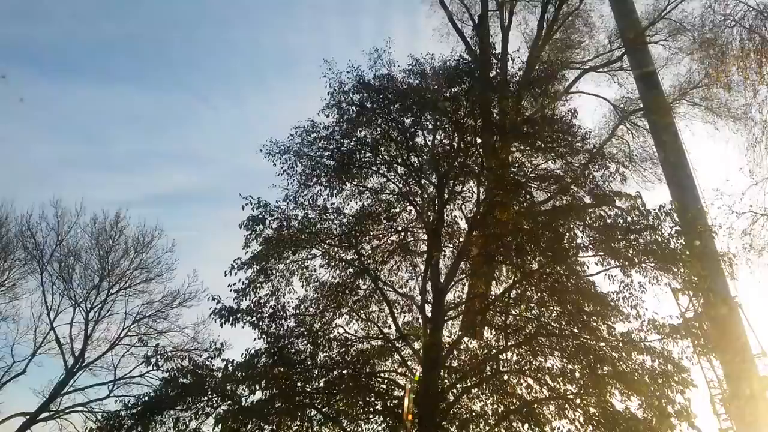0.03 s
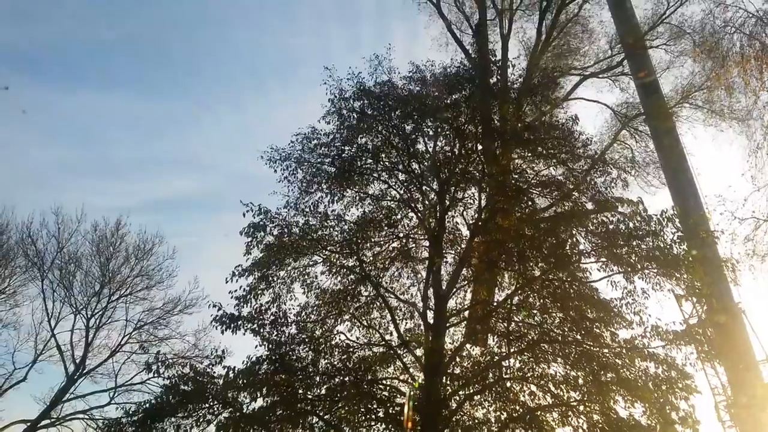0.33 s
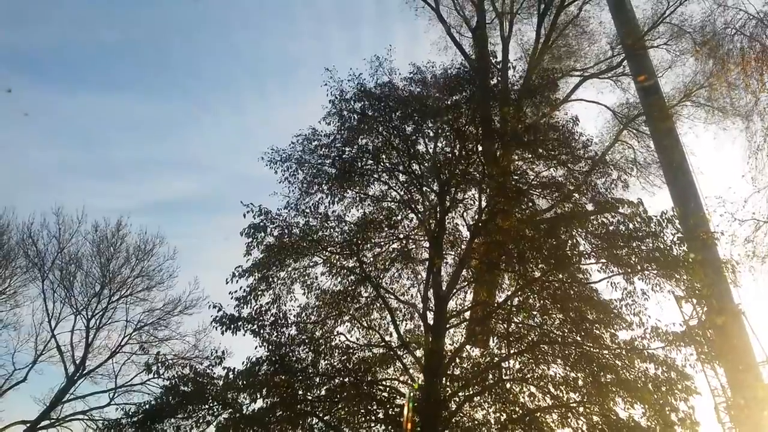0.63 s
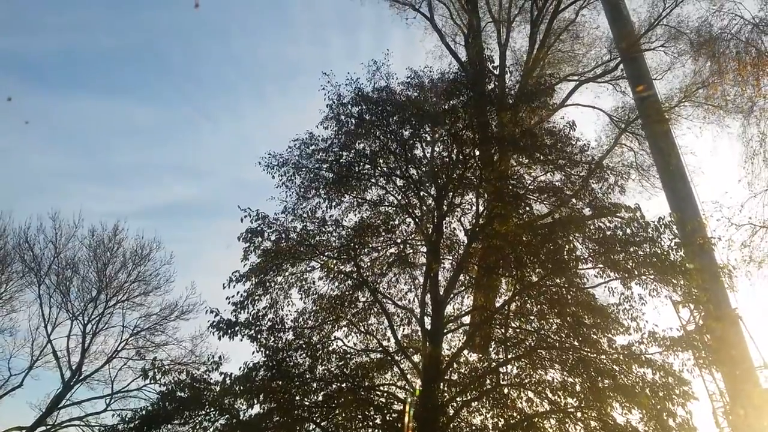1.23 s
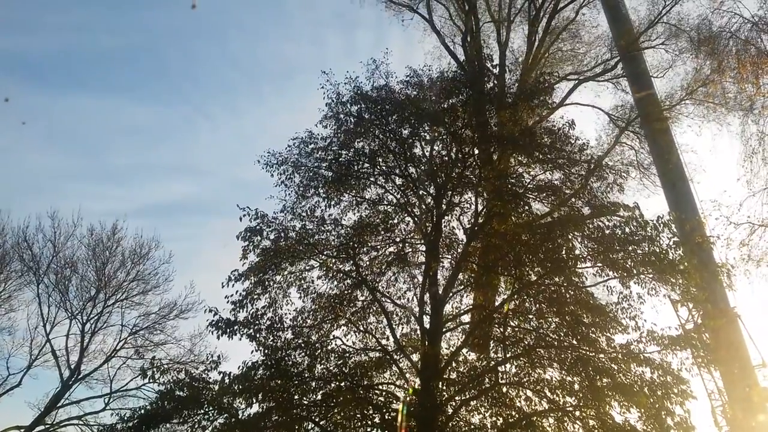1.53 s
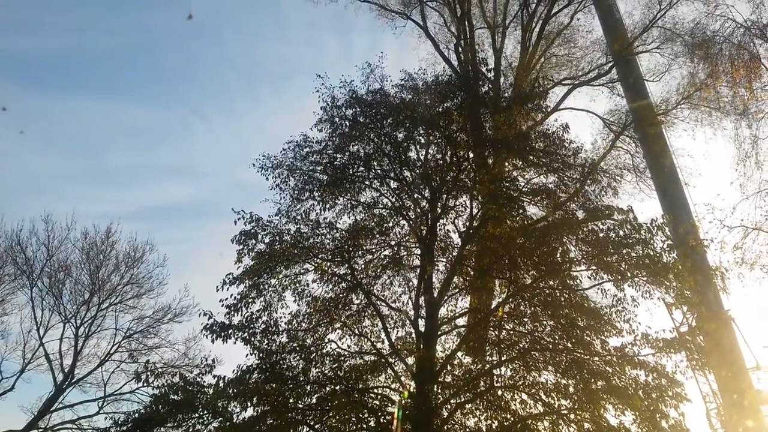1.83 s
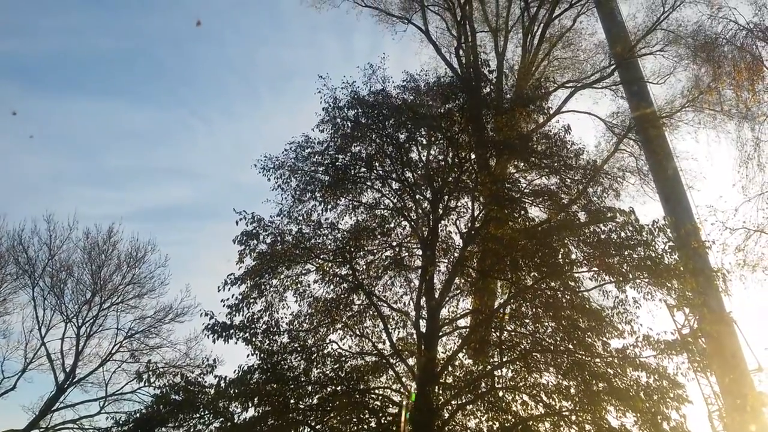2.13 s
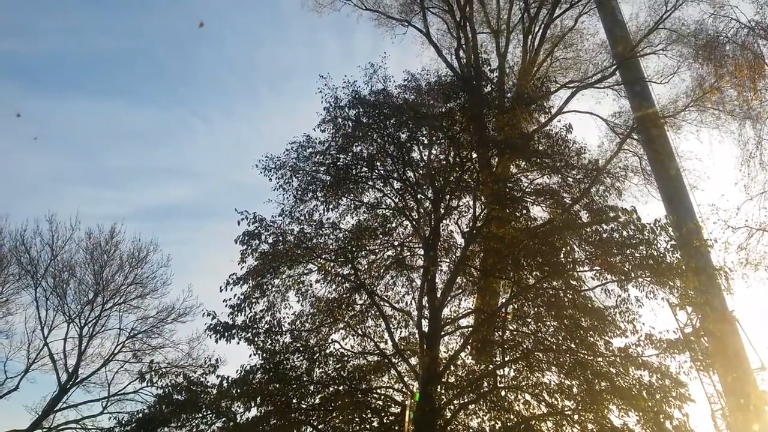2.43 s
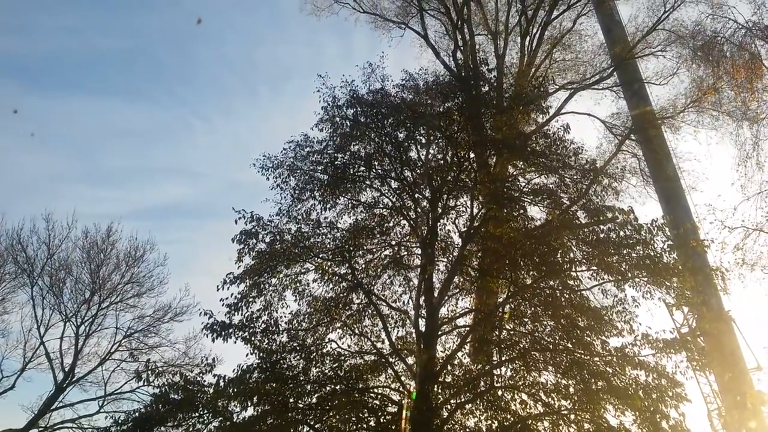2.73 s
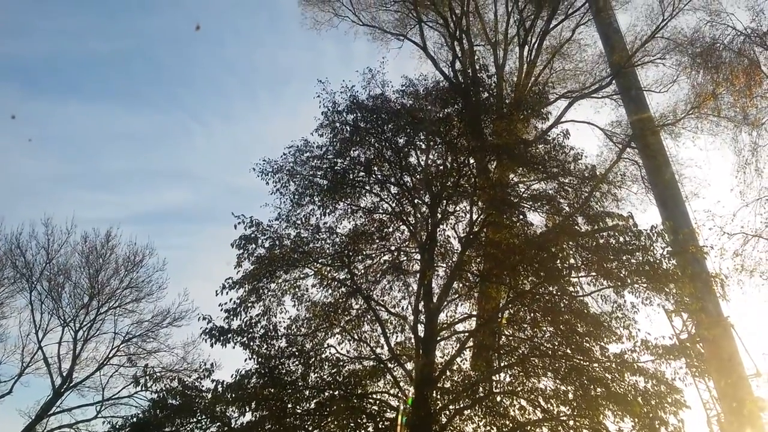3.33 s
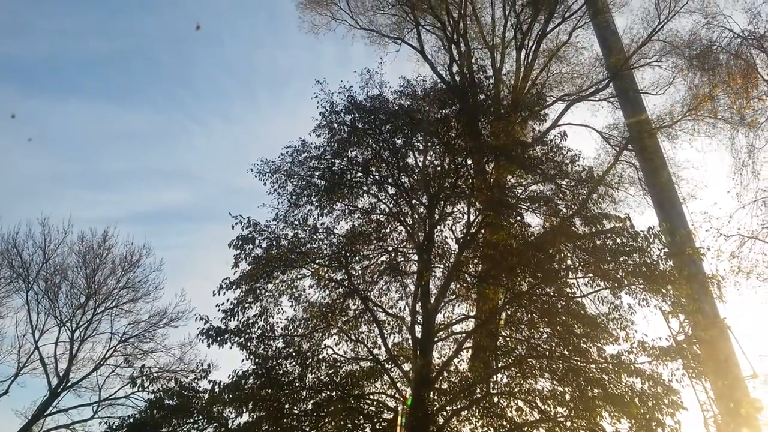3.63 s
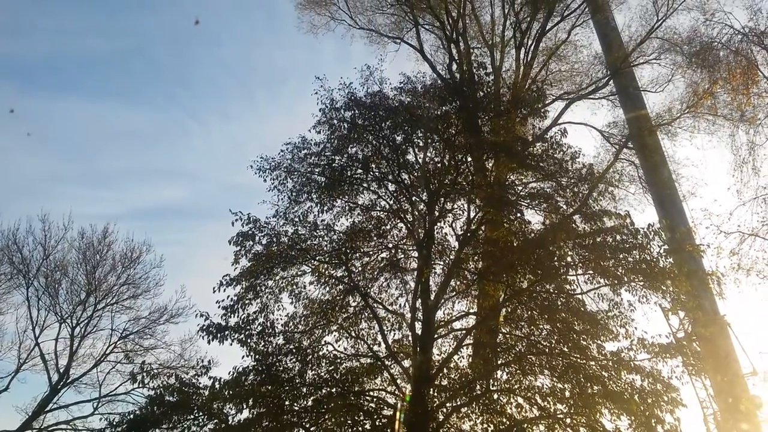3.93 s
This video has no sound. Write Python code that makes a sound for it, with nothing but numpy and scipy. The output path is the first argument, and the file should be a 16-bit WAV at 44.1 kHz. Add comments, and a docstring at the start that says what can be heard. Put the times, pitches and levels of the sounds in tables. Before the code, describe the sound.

Low engine rumble fades in among trees, with a wavering traffic drone, tyre wash and faint high chirring. Late on, something cracks loudly right at the microphone, a knock follows, and the background dips slightly.

```python
"""A distant engine idles outdoors under trees, its orders beating into a throb over a pulsing exhaust.
Far traffic adds a wavering drone and a wash of singing tyres; faint chirps and high chirring come and go.
Close by, dull knocks sound, and something, probably the microphone's housing, cracks in a quick rattle:
each contact booms, ticks and scrapes. The mix fades in, and a gain control ducks it after the crack."""
import sys
import numpy as np
from scipy import signal
from scipy.fft import rfft, irfft
from scipy.io import wavfile

SR = 44100
rng = np.random.default_rng(int(sys.argv[2]) if len(sys.argv) > 2 else 0)


def dump(signal):
    """Clip the signal to [-1, 1] and save it as 16-bit WAV at the path in sys.argv[1]."""
    limited = np.clip(np.atleast_2d(signal).T, -1, 1)
    pcm = np.round(limited * 32767).astype(np.int16)
    wavfile.write(sys.argv[1], SR, pcm)


N = 176400
T = np.arange(N) / SR

# engine hum: order of the cycle rate, level/dB
ENGINE_ORDERS = [(5, -49.5), (6, -38), (7, -56.5), (10, -55.5), (26, -59), (60, -64.5)]
# swell of one deeper order: t/s, level/dB
BOOM_SWELL = [(1.9, -53), (2.25, -40), (2.5, -39), (3.05, -59)]
# exhaust colour: f/Hz, relative level/dB
EXHAUST_COLOUR = [(25, -29), (50, -14.5), (85, -9.5), (125, -1), (180, -3), (230, -10.5), (330, -15),
                  (600, -22.5), (1500, -49)]
# a vehicle speeds up and fades, then a lower note takes over: t/s, f/Hz, level/dB
DRONE_CURVE = [(.4, 140.1, -43.5), (1.05, 140.7, -39.5), (1.7, 139.3, -41), (2.3, 153.7, -42.5),
               (2.6, 164, -50.5), (2.68, 120.1, -46), (3.2, 122, -47), (4, 130.9, -42.5)]
# its overtones: harmonic number, level/dB against the fundamental
DRONE_HARMONICS = [(2, -14.5), (3, -21.5), (4, -19.5)]
# tyres sing as cars go by: t/s, f/Hz, level/dB
SING_CURVE = [(1.2, 1370, -67.5), (1.85, 1464, -57), (2.25, 1438, -71.5), (3.1, 1375, -70),
              (3.42, 1558, -63), (3.7, 1600, -79)]
# colour of the tyre wash: f/Hz, relative level/dB
WASH_COLOUR = [(100, -18.5), (280, -2), (560, -0.5), (700, -8.5), (900, -3.5), (1100, -7), (1450, -8.5),
               (1800, -15.5), (2400, -16.5), (4000, -22), (9000, -38.5)]
# machine whines in the wash: f/Hz, width/Hz, level/dB against the wash
MACHINE_WHINES = [(834, 65, -15), (2299, 74, -20.5)]
# fader ride of the wash: t/s, level/dB
WASH_RIDE = [(.4, -50), (1.2, -52), (1.45, -48), (1.75, -47.5), (2.2, -51.5), (2.7, -49.5), (3.0, -50),
             (3.4, -49.5), (4, -52)]
# hiss colour: f/Hz, relative level/dB
HISS_COLOUR = [(500, -9), (3300, 1.5), (7000, 2), (14500, -2.5)]
# dull blows: t/s, strength/dB, pitch factor, hardness cutoff/Hz
KNOCK_HITS = [(0.4445, -4.5, 1.28, 450), (3.5770, 5, 0.957, 2200), (3.858, -22, 0.98, 800)]
# what they ring: f/Hz, relative level/dB, t60/s
KNOCK_RESONANCES = [(112, -23.5, 0.13), (188.6, -12, 0.067), (342, -15.5, 0.037), (470, -10, 0.014)]
# chirps, perhaps of birds: peak t/s, spread/s, f/Hz, width/Hz, level/dB
CHIRP_SWELLS = [(0.596, 0.0032, 2850, 1300, -48.5), (1.132, .012, 8750, 450, -61),
                (1.338, 0.035, 3350, 450, -59.5), (1.565, 0.022, 3360, 350, -60.5),
                (3.239, 0.023, 3750, 1000, -50), (3.6, 0.013, 3580, 900, -50.5),
                (3.869, 0.0084, 3560, 900, -54), (3.963, 0.0087, 3600, 900, -53)]
# chirring: start t/s, length/s, centre f/Hz, level/dB of a band at the centre
CHIRR_BURSTS = [(0.608, .1, 10300, -68.5), (0.734, .28, 11000, -67), (1.155, 0.2, 11160, -66),
                (1.358, .16, 10600, -66.5), (1.527, .22, 11100, -65), (1.813, 0.19, 10800, -65),
                (2.166, 0.22, 10300, -67.5), (2.42, 0.35, 10580, -67.5), (2.749, 0.216, 11100, -63.5),
                (3.065, .2, 10200, -66.5), (3.28, 0.19, 10600, -66), (3.65, 0.28, 10900, -68.5)]
# contacts of the crack: t/s, signed shove, tick level/dB, tick pitch factor
CRACK_CONTACTS = [(3.4930, 0.02, -8, 1.2), (3.4950, -0.87, -12.5, 1.05), (3.4969, 0.92, -5, 1.1),
                  (3.5075, .3, -31.5, .8), (3.512, .04, -13, 1.12), (3.5131, -1.3, 5, .9),
                  (3.5151, 1.3, -4, 0.92), (3.5200, -0.052, -8, 1.13), (3.5235, 1.19, -7, 0.85),
                  (3.579, -.04, -26, 0.92), (3.5843, 0.096, -23, 1.1)]
# body of the housing: f/Hz, relative level/dB, t60/s
BODY_MODES = [(168, -29.5, 0.19), (221, -22, 0.13), (335, -22.5, .09), (387, -18.5, 0.073),
              (450, -23.5, 0.067), (724, -19, 0.016)]
# its thin edge: f/Hz, relative level/dB, t60/s
EDGE_MODES = [(2700, -1.5, 0.0028), (3300, -3.5, 0.0064), (6270, -12.5, .004), (12800, -27, 0.008)]
# colour of the parts rubbing: f/Hz, relative level/dB
SCRAPE_COLOUR = [(2000, -3.5), (3600, 5), (5000, -5.5), (6500, -0.5), (10200, -20), (13000, -10.5)]
# opening fade: t/s, level/dB
FADE_CURVE = [(.375, -94), (.39, -26.5), (.45, -16.5), (.55, -9.5), (.64, -5)]


def from_db(db):
    """Decibels to gain."""
    return 10 ** (np.asarray(db) / 20)


def rms_one(x):
    """Scale to unit rms."""
    return x / np.sqrt(np.mean(x ** 2) + 1e-20)


def automation(rows):
    """Join breakpoints by straight lines, one curve per column after the time."""
    times, *columns = np.transpose(rows)
    return [np.interp(T, times, column) for column in columns]


def drift(rate_hz):
    """Smooth random modulation, rms about 1."""
    hop, run_in = 40, 2000
    pole = np.exp(-2 * np.pi * hop * rate_hz / SR)
    white = rng.standard_normal(N // hop + run_in + 2)
    slow = signal.lfilter([1], [1, -2 * pole, pole * pole], white)[run_in:]
    return np.interp(np.arange(N) / hop, np.arange(len(slow)), rms_one(slow))


def smooth(x, seconds):
    """One-pole low-pass with a time constant."""
    pole = np.exp(-1 / (seconds * SR))
    return signal.lfilter([1 - pole], [1, -pole], x + 1e-18)


def impulse(s):
    """A unit click at s seconds."""
    return signal.unit_impulse(N, int(s * SR))


def ring(clicks, hz, t60):
    """A resonator: a unit click starts a decaying sine of height 1."""
    r, w = np.exp(-np.log(1000) / (t60 * SR)), 2 * np.pi * hz / SR
    return signal.lfilter([0, np.sin(w)], [1, -2 * r * np.cos(w), r * r], clicks + 1e-18)


def noise(colour):
    """Coloured noise, rolled off below its lowest breakpoint, rms 1."""
    hz, db = np.transpose(colour)
    bins = np.maximum(np.arange(N // 2 + 1) * SR / N, 1)
    gain = from_db(np.interp(np.log(bins), np.log(hz), db)) * np.minimum(bins / hz[0], 1) ** 2
    return rms_one(irfft(rfft(rng.standard_normal(N)) * gain, N))


def band_noise(hz, width_hz):
    """Noise in one band, rms 1."""
    edges = np.clip([hz - width_hz / 2, hz + width_hz / 2], 20, .45 * SR)
    band_pass = signal.butter(2, edges, "band", fs=SR, output="sos")
    return rms_one(signal.sosfilt(band_pass, rng.standard_normal(N)))


def tone(hz):
    """A sine on a pitch curve, rms 1."""
    return np.sqrt(2) * np.sin(2 * np.pi * (np.cumsum(hz) / SR + rng.random()))


def swell(peak_s, spread_s, hz, width_hz, db):
    """A band of noise under a bell-shaped envelope."""
    return from_db(db) * np.exp(-.5 * ((T - peak_s) / spread_s) ** 2) * band_noise(hz, width_hz)


def idling_engine(cycle_hz=9.76, boom_order=4, exhaust_db=-41):
    """Neighbouring engine orders beat into a throb; the exhaust rumble pulses with the firing."""
    cycle = cycle_hz * (1 + .004 * drift(2))
    partials = [tone(round(order) * cycle) for order, _ in ENGINE_ORDERS]
    hum = sum(partial * from_db(db + 1.2 * drift(3)) for partial, (_, db) in zip(partials, ENGINE_ORDERS))
    boom = from_db(automation(BOOM_SWELL)[0]) * tone(boom_order * cycle)
    firing = 1 + .205 * partials[1]
    return hum + boom + from_db(exhaust_db) * noise(EXHAUST_COLOUR) * firing


def vehicle_drone(wander=.005, flutter_db=1.3, fading_db=2.5):
    """A far vehicle's wavering note, each overtone fading in and out on its own."""
    hz, level_db = automation(DRONE_CURVE)
    hz = hz * (1 + wander * drift(4.2))
    overtones = sum(from_db(db + fading_db * drift(3.8)) * tone(round(k) * hz)
                    for k, db in DRONE_HARMONICS)
    return from_db(level_db + flutter_db * drift(6)) * (tone(hz) + overtones)


def tyres(blur_hz=30):
    """Far tyres sing a blurred, gliding note over a road wash tinged with machine whine."""
    hz, sing_db = automation(SING_CURVE)
    sing = rms_one(drift(blur_hz) * tone(hz) + drift(blur_hz) * tone(hz + blur_hz))
    wash = noise(WASH_COLOUR) + sum(from_db(db) * band_noise(f, width) for f, width, db in MACHINE_WHINES)
    wash_db = automation(WASH_RIDE)[0] + .6 * drift(20)
    return from_db(sing_db) * sing + from_db(wash_db) * wash


def hiss(level_db=-56.5):
    """An even bed of airy noise."""
    return from_db(level_db) * noise(HISS_COLOUR)


def knocks():
    """Soft blows that reach only low modes; the lower two swing against the upper two."""
    out = 0
    for s, strength_db, pitch, hardness_hz in KNOCK_HITS:
        contact_s = 1 / (2 * np.pi * hardness_hz)
        force = from_db(strength_db) * smooth(smooth(impulse(s), contact_s), contact_s)
        for polarity, (hz, db, t60) in zip((-1, -1, 1, 1), KNOCK_RESONANCES):
            out += polarity * from_db(db) * ring(force, hz * pitch, t60 / pitch)
    return out


def chirps():
    """Short hoarse swells of narrow noise."""
    return sum(swell(*row) for row in CHIRP_SWELLS)


def chirring(band_hz=500, spread_hz=1560, ramp_s=.033, flicker_db=2.2, grain_db=3):
    """Grainy bursts of high noise bands, each sharing some flicker with its neighbours."""
    bands = np.arange(8000, 13500, band_hz)
    start, length, centre_hz, db = np.transpose(CHIRR_BURSTS)[:, :, None]
    gates = np.clip(np.minimum(T - start, start + length - T) / ramp_s + .5, 0, 1)
    colours = from_db(db) * np.exp(-.5 * ((bands - centre_hz) / spread_hz) ** 2)
    envelopes = colours.T @ gates
    flicker = [flicker_db * drift(30) for _ in range(len(bands) + 1)]
    chirr = sum(envelopes[k] * from_db(flicker[k] + flicker[k + 1]) * band_noise(hz, band_hz)
                for k, hz in enumerate(bands))
    return chirr * from_db(grain_db * drift(110))


def passing_car():
    """A car passes far off and brightens the wash."""
    return swell(peak_s=1.72, spread_s=.22, hz=1560, width_hz=1040, db=-57.5)


def crack(shove_s=.0002, click_hz=8000):
    """Each contact shoves the housing, which booms, and sets its edge ticking at a pitch of its own."""
    shove, ticks = 0, 0
    for s, push, tick_db, pitch in CRACK_CONTACTS:
        shove += push * np.exp(-np.minimum(np.abs(T - s - shove_s / 2) / shove_s, 20))
        click = np.sign(push) * from_db(tick_db) * smooth(impulse(s), 1 / (2 * np.pi * click_hz))
        ticks += sum(from_db(db) * ring(click, hz * pitch, t60) for hz, db, t60 in EDGE_MODES)
    force = shove / (2 * shove_s * SR)  # a push of 1 has the area of a unit click
    body = sum(from_db(db) * ring(force, hz, t60) for hz, db, t60 in BODY_MODES)
    punch = signal.sosfilt(signal.butter(2, 130, "high", fs=SR, output="sos"), shove)
    return punch + body + ticks


def rubbing(scrape_db=-15.5, scrape_s=.0012, tail_db=-45, tail_s=.011):
    """Each contact drags briefly, leaving a short scrape and a faint tail."""
    energy = sum(from_db(db) ** 2 * impulse(s) for s, _, db, _ in CRACK_CONTACTS)
    power = sum(from_db(db) ** 2 * decay_s * SR * smooth(energy, decay_s)
                for db, decay_s in ((scrape_db, scrape_s), (tail_db, tail_s)))
    return noise(SCRAPE_COLOUR) * np.sqrt(power)


def scene():
    """Mono mix: the far motor bed, the airy top and the close hits."""
    bed = passing_car() + idling_engine() + vehicle_drone() + tyres()
    top = chirring() + hiss() + chirps()
    hits = knocks() + crack() + rubbing()
    return (bed + top + hits)[None]


def record(dry, threshold_db=-25.5, attack_s=.18, release_db_per_s=2.5, ceiling=.86, cutoff_hz=14560):
    """Fade-in, a gain control that ducks after loud peaks and recovers slowly, clipping, a top cut."""
    faded = dry[0] * from_db(automation(FADE_CURVE)[0]) * (T > FADE_CURVE[0][0])
    level_db = 10 * np.log10(smooth(faded ** 2, .01) + 1e-12)
    over_db = np.maximum(level_db - threshold_db, 0)
    release_db = release_db_per_s * T
    held_db = np.maximum.accumulate(over_db + release_db) - release_db
    clipped = np.clip(faded * from_db(-smooth(held_db, attack_s)), -ceiling, ceiling)
    top_cut = signal.ellip(12, .1, 100, cutoff_hz, fs=SR, output="sos")
    return signal.sosfilt(top_cut, clipped)[None]


dry = scene()
out = record(dry)
dump(out)
```